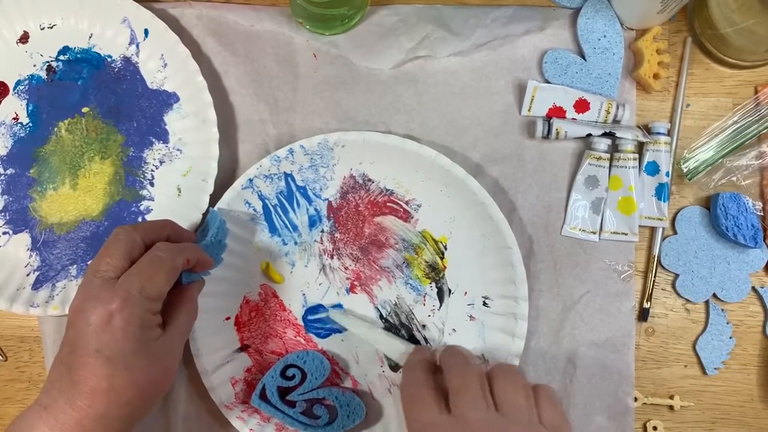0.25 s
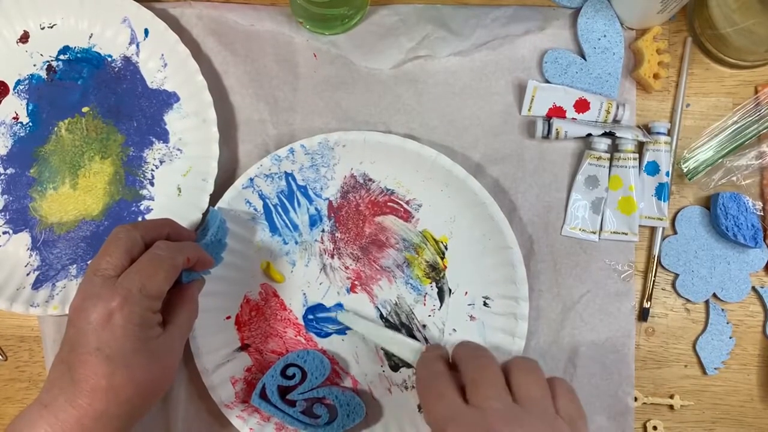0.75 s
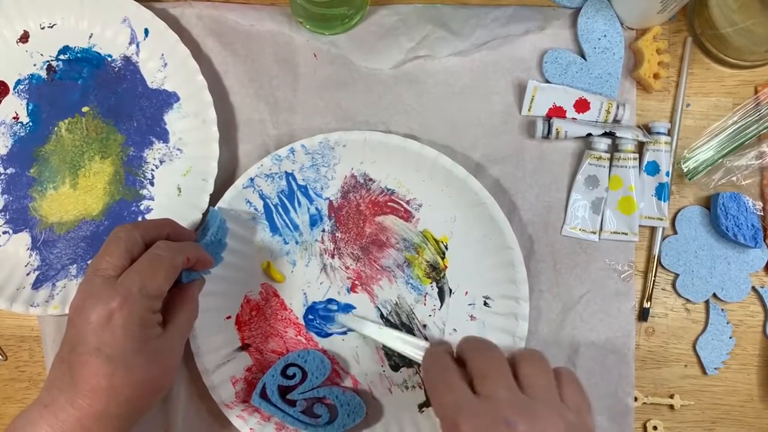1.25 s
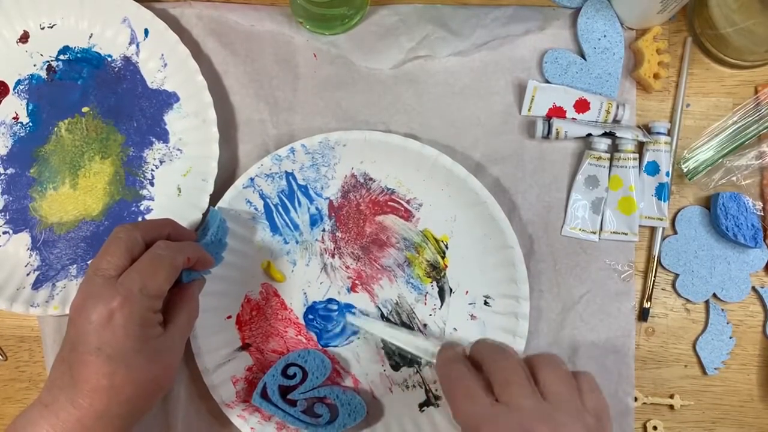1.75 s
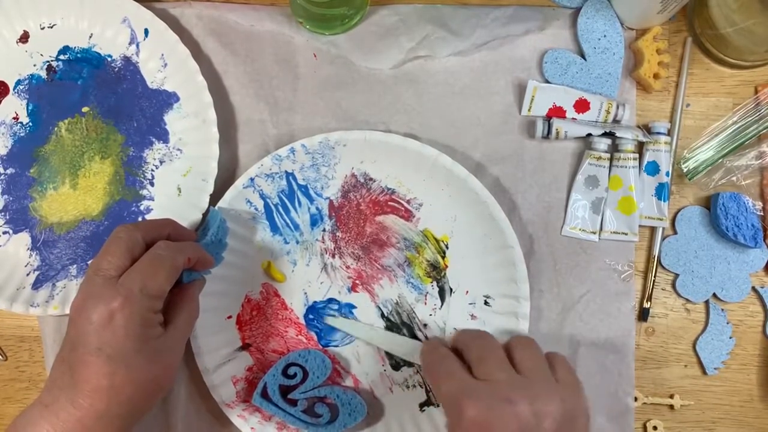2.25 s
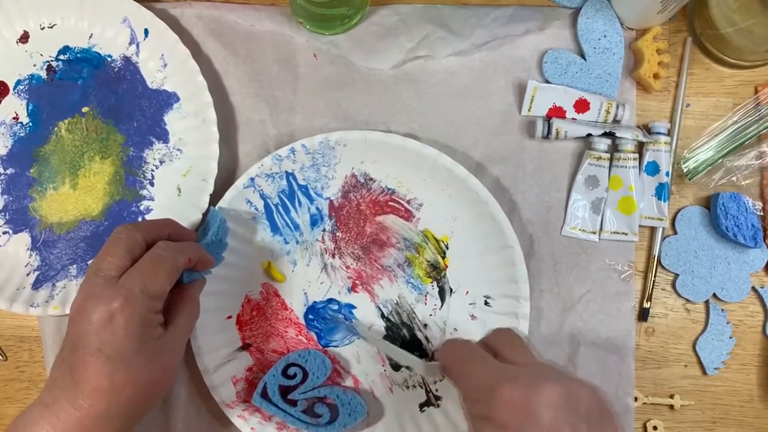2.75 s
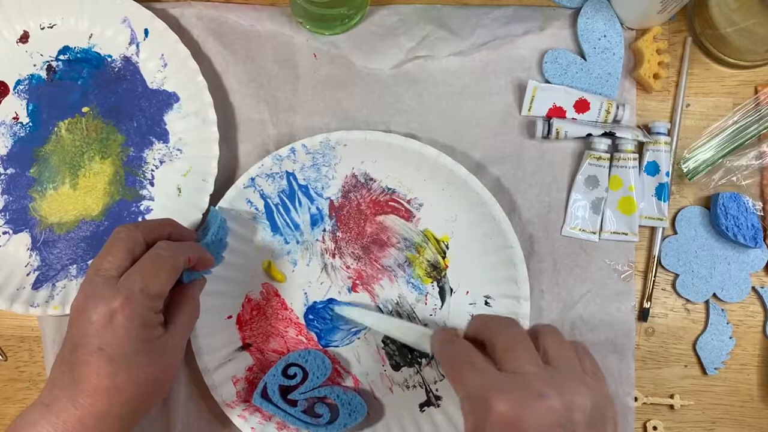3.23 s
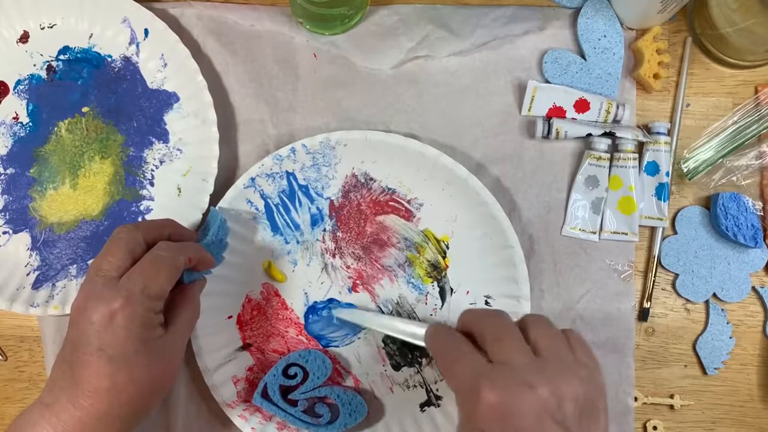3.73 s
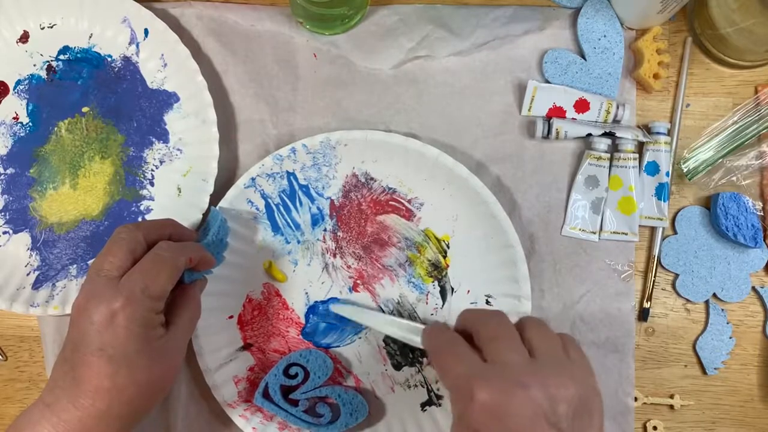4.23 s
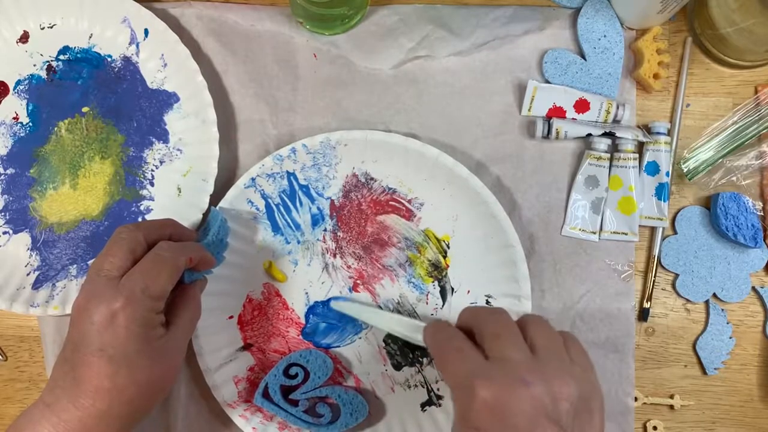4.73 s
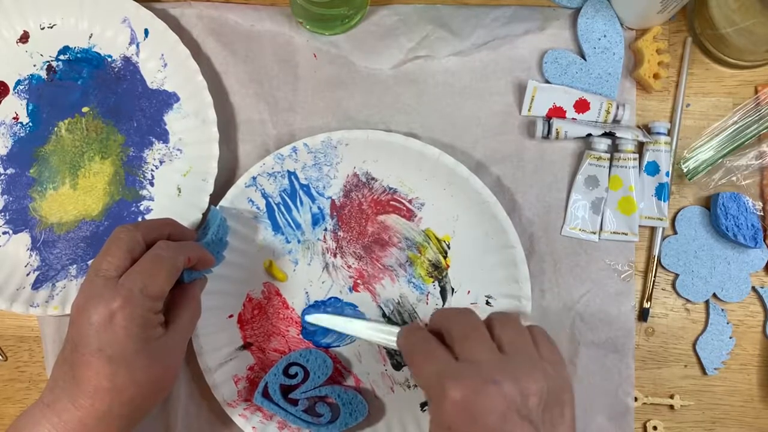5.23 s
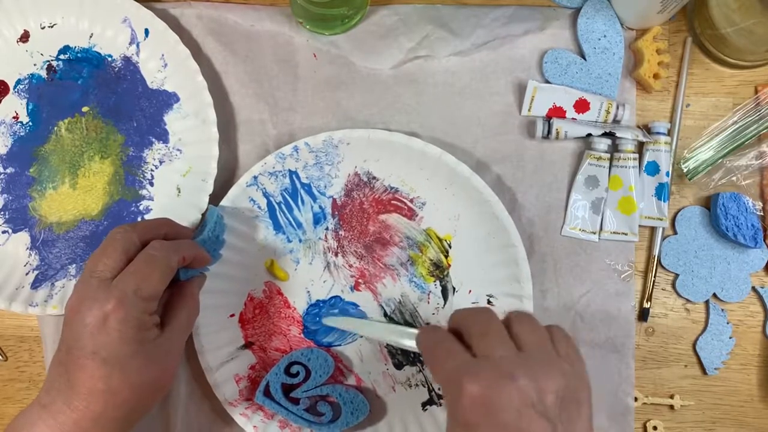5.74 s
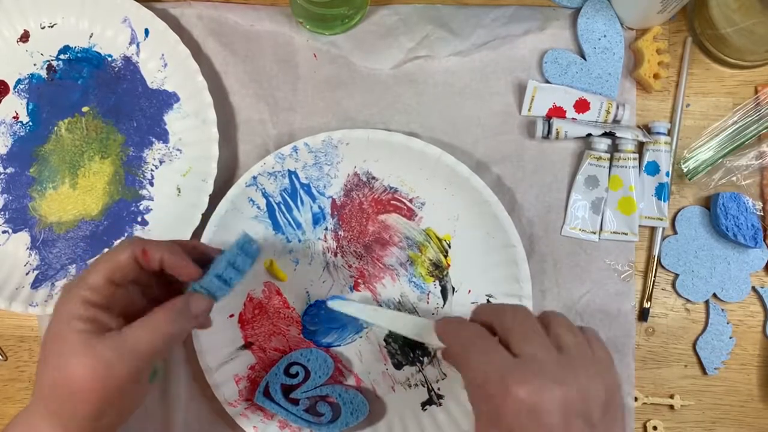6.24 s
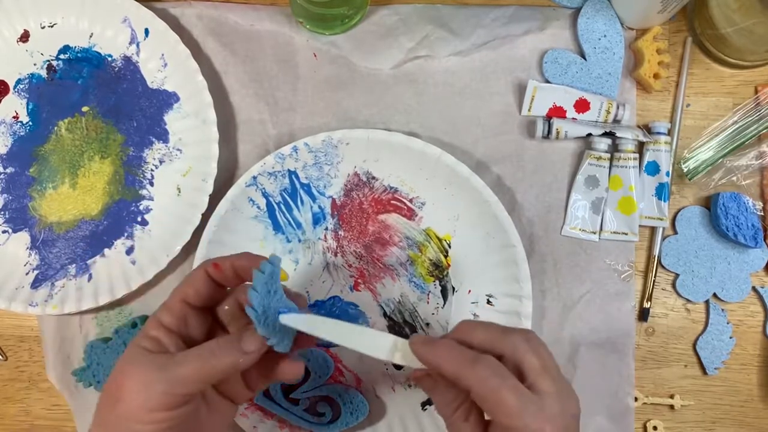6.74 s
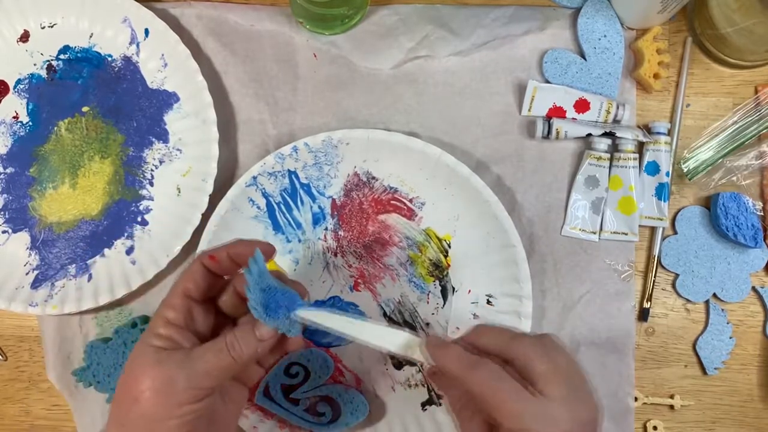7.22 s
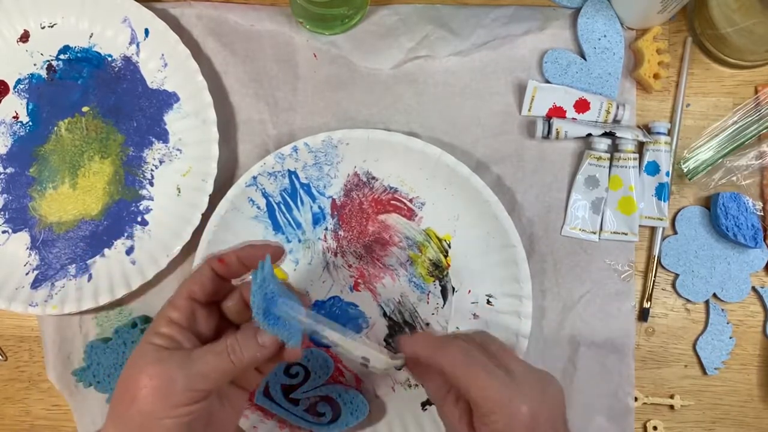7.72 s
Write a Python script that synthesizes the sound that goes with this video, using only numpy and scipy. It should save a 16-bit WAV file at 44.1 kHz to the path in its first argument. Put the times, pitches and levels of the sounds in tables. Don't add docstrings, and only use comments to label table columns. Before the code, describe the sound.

In a quiet room, a plastic blade scrapes back and forth rapidly on a thin paper plate, hollow and scratchy, with irregular taps and tiny clicks. The rhythm loosens briefly around the third second, then resumes evenly. Finally the hand shifts with low soft bumps and wipes the blade gently on a sponge. Distant traffic rumbles deeply throughout; one faint bird chirp comes early. Recorded close by a phone in stereo.

```python
import sys
import numpy as np
from scipy import signal
from scipy.fft import rfft, irfft, next_fast_len
from scipy.io import wavfile
from scipy.ndimage import uniform_filter1d, map_coordinates

SR = 44100
rng = np.random.default_rng(int(sys.argv[2]) if len(sys.argv) > 2 else 0)


def how_loud(loudness_db):
    steps = np.asarray(loudness_db, float) / 20
    return 10 ** steps


def master(y):
    cut = np.clip(np.atleast_2d(y).T, -1, 1)
    pcm = np.round(cut * 32767)
    wavfile.write(sys.argv[1], SR, pcm.astype(np.int16))


N = 351679
T = np.arange(N) / SR

# [t/s, plate level/dB, skid length/s]
LANDINGS = [(0.224, -59.5, 0.0039), (0.24, -64, 0.016), (0.442, -73, 0.018), (0.464, -55.5, 0.013),
            (0.493, -61, 0.049), (0.758, -61, 0.1), (1.039, -70, 0.033), (1.2714, -51.5, 0.046),
            (1.526, -62, 0.011), (1.7495, -53.5, 0.027), (2.046, -62.5, 0.019), (2.261, -52, 0.019),
            (3.455, -52.5, 0.023), (3.713, -55.5, 0.04), (3.978, -55.5, 0.038), (4.193, -53, 0.051),
            (4.4468, -56, 0.033), (4.698, -53.5, 0.052), (4.931, -50.5, 0.031), (5.183, -56.5, 0.066),
            (5.4, -56.5, 0.014), (5.6073, -54.5, 0.055), (5.778, -55, 0.023), (5.823, -55, 0.01),
            (5.846, -51.5, 0.04), (6.082, -56, 0.041), (6.299, -60, 0.017)]
# [t/s, peak level/dB]
LIFTS = [(0.1023, -48), (0.383, -50), (0.6477, -49), (0.915, -50.5), (1.2046, -53), (1.4513, -51),
         (1.688, -50), (1.906, -50), (2.176, -48.5), (2.558, -52), (2.731, -60.5), (2.913, -54),
         (3.182, -61.5), (3.373, -65), (3.627, -48), (3.8859, -47.5), (4.3765, -50.5), (4.147, -55),
         (4.619, -55), (4.8686, -58), (5.106, -56), (5.3259, -50), (5.5486, -50), (6.007, -54.5),
         (6.251, -61.5)]
# [f/Hz, level/dB]
EDGE = [(5000, -38), (6800, -2.5), (8200, -13), (9500, 1.5), (10700, -1), (14500, -6.5), (15700, -11),
        (16000, -82)]


def scrape():
    # [t/s at top speed, plate level/dB, half length/s, edge hiss over plate/dB]
    sweeps = [(0.027, -54.5, 0.046, -9), (0.309, -50, 0.039, -7), (0.572, -53, 0.038, -7.5),
              (0.844, -52.5, 0.038, -6.5), (1.128, -49, 0.036, -8.5), (1.393, -50.5, 0.031, -7.5),
              (1.625, -49, 0.042, -8), (1.852, -48, 0.036, -4), (2.127, -49.5, 0.037, -6.5),
              (2.424, -51.5, 0.078, -10.5), (2.802, -55.5, 0.02, -16.5), (2.834, -61.5, 0.1, -18.5),
              (3.318, -58, 0.023, -6.5), (3.554, -50.5, 0.036, -9), (3.835, -49.5, 0.039, -6.5),
              (4.09, -47.5, 0.014, -1.5), (4.109, -50, 0.031, -7), (4.321, -48.5, 0.034, -7),
              (4.559, -52, 0.029, -9.5), (4.812, -50.5, 0.037, -10), (5.045, -49.5, 0.033, -8),
              (5.282, -49, 0.03, -6.5), (5.491, -49, 0.038, -8), (5.733, -48.5, 0.033, -7),
              (5.952, -53, 0.036, -5), (6.181, -53, 0.036, -8.5), (6.354, -61.5, 0.016, -14)]
    spots = [0.19, 0.21, .4, 0.48, 0.46, 0.51, 0.3, 0.65, 0.22, .4, 0.54, 0.82, 0.3, .4, .4, 0.58, 0.22,
             0.53, 0.57, 0.22, 0.27, 0.81, 0.83, 0.45, 0.84, 0.61, 0.29]
    # [f/Hz, level/dB]
    middle_colour = [(900, -7.5), (1800, -1), (2600, -1), (3300, 2), (4300, -0.5), (5500, 1.8),
                     (9000, -0.5)]
    # [f/Hz, level/dB]
    rim_colour = [(900, -12), (1800, -8), (2600, -10), (3300, 0), (4200, 4.5), (5500, 1.5), (9000, 2)]
    longest_s = 0.08
    plate_longer, fall_longer = 1.17, 0.83
    skid_hiss_db, scuff_db, scuff_hiss_db, scuff_s = -11, -10, -14, 0.013
    nearing_db, nearing_s = -11.5, 0.006

    t = T[::20]
    power = np.zeros((3, len(t)))
    for s, db, skid in LANDINGS:
        way = np.abs(t - s) / min(skid, longest_s)
        levels = np.array([[db], [db + skid_hiss_db]])
        power[::2] += how_loud(levels - 6 * way ** 3) ** 2 * (t >= s)
        before = t < s
        power[0] += how_loud(db + nearing_db - 9 * (s - t) / nearing_s * before) ** 2 * before
    for s, db, half, over in sweeps:
        way = (t - s) / (min(half, longest_s) * np.where(t < s, 1, fall_longer))
        levels = np.array([[db], [db + over]])
        power[1:] += how_loud(levels - 7 * (way / [[plate_longer], [1]]) ** 2) ** 2
    for s, db in LIFTS:
        levels = scuff_db + np.array([[db], [db + scuff_hiss_db]])
        power[::2] += how_loud(levels - 7 * ((t - s) / scuff_s) ** 2) ** 2
    power = uniform_filter1d(power, size=3, axis=1)
    slow, fast, edge = (np.interp(T, t, np.sqrt(np.abs(p))) for p in power)

    def rub_colours(f):
        flat = np.zeros_like(f)
        return plate(f) * how_loud([[flat], [along(middle_colour, f)], [along(rim_colour, f)]])

    rub, dull, bright = grit(rub_colours, 1.8, 2.4, 2.6)
    hiss = grit(colour(EDGE), 1.9, 1.9, 0.89)
    rim = np.interp(T, [row[0] for row in sweeps], np.clip(spots, 0, 1))
    sweep = (1 - rim) * dull + rim * bright
    return how_loud(-4.5) * (slow * rub + fast * sweep) + how_loud(2.5) * edge * hiss


def taps():
    # [t/s, peak level/dB, ringing f/Hz, crack level over it/dB]
    tip_hits = [(0.257, -48, 3470, -1), (0.3742, -58, 4200, -29), (0.495, -55, 3910, -8),
                (0.694, -64.5, 5470, -20), (0.7892, -49.5, 2320, -21), (1.0715, -50.5, 4130, -12),
                (1.3058, -67, 2490, -19), (1.55, -67, 2510, -14), (2.0657, -50.5, 2550, -5),
                (2.2974, -44, 2540, -13), (2.3398, -58, 1690, -11), (2.3755, -52, 2500, -17),
                (6.222, -53.5, 2500, -8), (2.4959, -56.5, 3300, -11), (2.5202, -51, 2800, -18),
                (2.591, -55.5, 2430, -32), (2.7105, -46, 2500, -38), (2.929, -60.5, 2550, -34),
                (3.1874, -46.5, 3800, -16), (3.2231, -62, 5500, -17), (3.342, -51, 2270, -24),
                (3.4788, -47.5, 2700, -25), (3.742, -51.5, 2500, -23), (4.2312, -47.5, 2540, -20),
                (4.4758, -51, 2750, -8), (4.7178, -46, 3100, -21), (4.9634, -52, 3080, -17),
                (5.439, -52.5, 2100, -24), (5.8466, -69, 3100, -14), (6.0992, -72, 3997, -15),
                (0.094, -64, 3470, -20), (0.348, -54, 3500, -15), (1.7, -53, 3670, -15),
                (1.781, -54, 2300, -20), (2.19, -53.5, 2500, -19), (2.574, -58.5, 4440, -15),
                (2.978, -74.5, 2500, -42), (3.214, -61, 2600, -32), (3.2975, -58, 3760, -12),
                (3.364, -56.5, 3000, -15), (4.0538, -58, 2140, -23), (4.392, -57.5, 2300, -23),
                (4.407, -57, 2500, -18), (4.5217, -55, 3050, -8), (4.632, -62, 3000, -18),
                (5.118, -64, 2500, -18), (5.428, -63, 1800, -28), (5.877, -53, 2500, -20),
                (6.2995, -55, 2560, -23)]
    # [t/s, peak level/dB, f/Hz]
    more_hits = [(0.3324, -50, 5500), (.125, -65, 3500), (.529, -52, 4170), (2.032, -68, 2500),
                 (2.135, -53, 3000), (2.149, -57, 6500), (2.567, -54, 5000), (3.761, -58, 5000),
                 (3.901, -64, 3000), (4.6, -55.5, 3500), (4.8727, -61, 3000), (4.952, -63, 3300),
                 (5.199, -59, 2500), (5.336, -63, 3000), (5.36, -72, 3000), (5.643, -60, 1900),
                 (6.125, -60, 3000), (6.228, -65, 3000)]
    # [t/s, peak level/dB, f/Hz, 60 dB decay/s]
    pings = [(1.551, -56, 12000, .003), (2.3765, -46, 6900, .005), (2.7113, -36, 3550, .008),
             (2.712, -44, 5600, .007), (2.712, -48, 7300, .006), (2.7112, -45, 1740, .012),
             (2.7114, -38, 2800, .006), (1.2732, -48, 2500, .014), (1.2732, -51, 1650, .012),
             (2.7116, -39, 2540, .022), (.3311, -38, 12500, .003), (2.1151, -45, 12000, .003),
             (3.5224, -46, 12500, .003), (3.7973, -47, 11500, .003), (4.3041, -43, 12500, .003),
             (5.0275, -42, 12500, .003), (5.251, -46, 12000, .003), (5.464, -46, 12500, .003),
             (5.7069, -45, 12000, .003), (3.421, -64, 8200, .004), (4.0766, -37, 12500, .003),
             (4.3246, -32, 12800, .003), (4.5187, -56, 12000, .003), (5.8477, -54, 12000, .003)]
    blows = tip_hits + [(s, db - 2, 2300, -11) for s, db, _ in LANDINGS]
    blows += [(s, db, hz, -14) for s, db, hz in more_hits]
    blows += [(s, db, 2550, -21.5) for s, db in LIFTS]

    size = 900
    t = np.arange(size) / SR
    soft_start = 1 - np.exp(-t / 0.0016)
    ring, spot, crack = np.zeros((3, 2, N + size))
    bursts = rng.standard_normal((len(blows), 3, 2, size)) * soft_start
    for (s, db, hz, crack_db), burst in zip(blows, bursts):
        start = round(s * SR)
        at = slice(start, start + size)
        ring[:, at] += how_loud(db + 2.5 - 60 * t / 0.037) * burst[0]
        spot[:, at] += how_loud(db + 4) * knock(hz, 1.1, 0.013, burst[1])
        crack[:, at] += how_loud(db + crack_db - 1.5 - 60 * t / 0.008) * burst[2]
    for s, db, hz, t60 in pings:
        start = round(s * SR)
        spot[0, start:start + size] += how_loud(db - 60 * t / t60) * np.sin(2 * np.pi * hz * t)
    for s, db, _ in LANDINGS:
        crack[0, round(s * SR)] += how_loud(db - 16 + 17)
    return filtered(ring[:, :N], plate) + spot[:, :N] + filtered(crack[:, :N], colour(EDGE))


def plate(f):
    # [f/Hz, width/Hz, level/dB]
    resonances = [(1200, 640, -8), (1763, 160, 1), (1857, 510, -3.5), (2500, 184, 8), (3330, 1020, 1),
                  (4286, 780, 1), (5140, 560, 1), (7220, 2100, -6.5)]
    total = 0
    for k, (centre, width, db) in enumerate(resonances):
        damping = 1j * f * width
        total = total + (-1) ** k * how_loud(db) * damping / (centre * centre - f * f + damping)
    return total / (1 + 1j * f / 9500 - (f / 9500) ** 2) ** 2


def grit(response, spiky_db, clump_db, patchy_db):
    grain = how_loud(spiky_db * rng.exponential(size=N) + clump_db * wobble(260))
    noise = grain * rng.standard_normal((2, N))
    return unit(filtered(patchy(noise, patchy_db, size=512, count=5), response))


def sponge():
    # [t/s, level/dB, half length/s]
    wipes = [
        (7.335, -72, 0.046),
        (7.64, -67.5, 0.042),
        (7.756, -78, 0.017),
    ]
    # [f/Hz, level/dB]
    sponge_colour = [(2500, -30), (4800, -26), (5500, -3.5), (8000, -9), (11000, -4), (14000, -12),
                     (16000, -40)]
    press = sum(how_loud(db - 4.5 * np.clip((T - s) / half, -3, 3) ** 4) for s, db, half in wipes)
    return press * unit(filtered(rng.standard_normal((2, N)), colour(sponge_colour)))


def bumps():
    # [t/s, level/dB, f/Hz]
    knocks = [(0.117, -85, 610), (0.258, -71, 706), (0.47, -76, 754), (0.654, -63.5, 1390), (0.8, -77, 800),
              (1.42, -78, 700), (3.221, -72.5, 895), (3.75, -80, 800), (4.96, -80, 826), (0.691, -81, 530),
              (1.276, -67.5, 900), (1.688, -77, 686), (1.909, -67, 410), (2.594, -87, 490),
              (2.712, -70, 1130), (2.715, -62, 825), (2.711, -59.5, 1670), (2.734, -72, 1090),
              (4.195, -63, 1670), (4.475, -69, 990), (5.974, -71, 423), (6.082, -72, 1200),
              (6.302, -72, 1650), (7.359, -83, 375), (7.503, -84, 475), (4.459, -70.5, 327),
              (5.45, -72, 300), (5.57, -72, 520), (5.641, -67, 930), (5.824, -62, 1090), (5.823, -64, 2100),
              (5.834, -68.5, 338), (6.925, -76, 2350), (6.926, -73.5, 1700), (6.923, -67.5, 1200),
              (6.928, -67.5, 540), (6.945, -78, 1910), (6.975, -80, 1300), (6.942, -62.5, 540),
              (6.924, -78, 3400), (6.934, -65, 227), (6.943, -65, 300), (6.955, -72, 553),
              (6.96, -61.5, 253), (6.972, -67, 420), (6.983, -76, 497), (6.996, -73, 383),
              (7.661, -71, 480), (7.69, -75, 470), (7.821, -75.5, 1380), (7.899, -74, 1100)]
    size = 2600
    out = np.zeros((2, N + size))
    bursts = rng.standard_normal((len(knocks), 2, size))
    for (s, db, hz), burst in zip(knocks, bursts):
        start = round(s * SR)
        out[:, start:start + size] += how_loud(db + 10.5) * knock(hz, 2.4, 0.054 + 11 / hz, burst)
    return out[:, :N]


def knock(hz, sharp, t60, burst):
    t = np.arange(burst.shape[1]) / SR
    peak = signal.iirpeak(hz, sharp, SR)
    once = signal.lfilter(*peak, burst * how_loud(-60 * t / t60))
    ring = signal.lfilter(*peak, once)
    return ring / np.abs(ring).max()


def walls(x):
    # [f/Hz, 60 dB decay/s]
    decay = [(500, 0.53), (3000, 0.12), (12000, 0.13)]
    step = SR // 4
    out = np.zeros((2, N + SR))
    for at in range(0, N, step):
        hz, t, z = signal.stft(rng.standard_normal((2, SR // 3)), SR, nperseg=256)
        dying = z * how_loud(-60 * t / along(decay, hz)[:, None])
        tail = signal.istft(dying, SR, nperseg=256)[1]
        echo = signal.fftconvolve(x[:, at:at + step], tail / np.linalg.norm(tail[0]), axes=1)
        out[:, at:at + echo.shape[1]] += echo
    return out[:, :N]


def outdoors():
    # [t/s, level/dB]
    traffic = [(0, -44.5), (0.15, -45.5), (0.48, -47), (0.62, -50.5), (1.64, -49.5), (2.05, -50),
               (2.26, -42.5), (3.4, -47), (4.2, -49.5), (4.95, -50.5), (5.15, -53), (6.57, -55.5),
               (7.05, -50), (7.4, -51.5), (7.97, -49.5)]
    # [f/Hz, level/dB]
    rumble = [(35, -25.5), (60, -4.5), (68, -10), (81, -10.5), (122, -14), (151, -29), (200, -47.5),
              (300, -120)]
    # [f/Hz, level/dB]
    mode_band = [(25, -120), (47, -7), (53, 0), (60, -6), (110, -120)]
    # [f/Hz, level/dB]
    deep = [(12, -10.5), (25, -8.5), (36, -0.5), (46, -6.5), (64, -120)]
    # [f/Hz, level/dB]
    drone = [(100, -10), (170, -4), (291, -4), (365, -16), (505, -12), (594, -25.5), (800, -43.5),
             (1300, -120)]
    # [f/Hz, level/dB]
    air_colour = [(500, -8), (640, -6.5), (820, -5), (1050, -3), (2000, -8), (4500, -12.5), (13300, -12.5),
                  (14000, -37)]
    # [f/Hz, likeness 0 to 1]
    room_alike = [(100, 0.95), (200, 0.75), (400, 0.23), (2000, 0.2), (4500, 0.25), (7000, 1), (15000, 1)]
    rumble_db, = curves(traffic)
    more_db = rumble_db + 52
    low = how_loud(rumble_db) * (hush(rumble) + how_loud(4) * hush(mode_band))
    low += how_loud(-57.5 + 1.77 * more_db) * hush(deep)
    low += how_loud(-71 + 0.63 * more_db) * hush(drone)
    air = how_loud(-80 + 1.3 * wobble(6.5)) * hush(air_colour)
    engines = passing() * how_loud([[-1.5], [1.5]])
    chirp = bird() * how_loud([[1.5], [-1.5]])
    return spread(low + air, room_alike) + room_mode() + engines + chirp


def room_mode():
    # [t/s, level/dB, f/Hz, half length/s]
    swells = [(0.2, -41, 50.44, 0.27), (0.47, -38.5, 53, 0.052), (0.8, -39, 55.8, 0.032),
              (1.15, -49, 53.95, 0.63), (1.42, -57, 48.6, 0.045), (1.6, -39, 55.3, 0.044),
              (1.83, -43.5, 58, 0.044), (2.04, -40, 54.6, 0.023), (2.31, -27, 53, 0.066),
              (2.59, -31, 51.5, 0.065), (2.8, -34, 52.8, 0.016), (2.952, -28, 47.4, 0.064),
              (3.22, -37.5, 51.4, 0.41), (3.44, -52, 54.5, 0.03), (3.6, -34, 52.6, 0.04),
              (3.79, -58, 49.2, 0.024), (4.01, -34.5, 55.65, 0.048), (4.245, -36.5, 49.5, 0.036),
              (4.49, -43, 49.4, 0.037), (4.78, -41.5, 56, 0.042), (4.9, -36.5, 50, 0.029),
              (5.17, -41.5, 57.2, 0.055), (5.48, -41, 53.3, 0.042), (5.65, -45.5, 52.9, 0.067),
              (6.49, -41.5, 50, 0.023), (6.82, -43.5, 51.1, 0.078), (7.05, -37.5, 54, 0.053),
              (7.22, -36.5, 52.1, 0.047), (7.5, -46, 52.94, 0.57), (7.82, -44, 53.4, 0.11)]
    out = np.zeros(N)
    for k, (s, db, hz, half) in enumerate(swells):
        swell = how_loud(db - 5.5 * np.clip((T - s) / half, -5, 5) ** 2)
        out += (-1) ** k * np.sqrt(2) * swell * np.sin(2 * np.pi * hz * (T - s))
    return out


def passing():
    # [start t/s, end t/s, starting f/Hz, level/dB, width/Hz]
    vehicles = [(.2, 4.4, 346, -86, 3), (4.0, 6.2, 953, -88, 13), (5.4, 7.5, 1242, -92, 14),
                (1.06, 1.29, 1280, -71.5, 320), (.85, 1.35, 1320, -75, 600), (0.7, 1.39, 1500, -81, 1300),
                (7.45, 7.78, 1150, -80, 1100), (-.2, .3, 1500, -80, 1200), (7.5, 7.8, 1750, -84, 900),
                (0.85, 1.42, 950, -80, 400), (0.85, 1.42, 600, -76, 300), (0.7, 1.45, 330, -73, 150),
                (1.8, 3.6, 1690, -88, 110), (.6, 1.55, 520, -76.5, 69), (4, 6.7, 535, -79, 45)]
    sinks_per_s = 0.021
    out = np.zeros(N)
    for start, end, from_hz, db, width in vehicles:
        at = (T >= start) & (T < end)
        t = T[at] - start
        swell = np.sin(np.pi * t / (end - start)) ** 0.42
        turn = 2 * np.pi * np.cumsum(from_hz * (1 - sinks_per_s * t)) / SR
        sway = rng.standard_normal((2, 2000))
        a, b = (np.interp(t * width, np.arange(2000), part) for part in sway)
        out[at] += how_loud(db) * swell * ((a + 10 / width) * np.sin(turn) + b * np.cos(turn))
    return out


def bird():
    # [t/s, f/Hz, level/dB]
    low_note = [(.105, 5200, -81), (.125, 5300, -77), (.165, 5330, -77), (.222, 5040, -79)]
    # [t/s, f/Hz, level/dB]
    high_note = [(.176, 7150, -90), (.188, 7080, -84), (.2, 6900, -84), (.212, 6700, -90)]
    return tone(low_note, 0.32) + tone(high_note, 0.4)


def tone(rows, rough):
    hz = curves(rows)[0]
    db = curves(rows, -200)[1]
    return np.sqrt(2) * how_loud(db) * np.sin(2 * np.pi * np.cumsum(hz) / SR + rough * wobble(25))


def hush(points):
    noise = patchy(rng.standard_normal((2, N)), 2.8, size=2048, count=5)
    return unit(filtered(noise, colour(points)))


def patchy(pair, patchy_db, size, count):
    z = signal.stft(pair, nperseg=size)[2]
    field = uniform_filter1d(rng.standard_normal(z.shape[1:]), count, axis=0)
    field = uniform_filter1d(field, size=5, axis=1)
    return signal.istft(z * how_loud(patchy_db * unit(field)), nperseg=size)[1][:, :N]


def spread(pair, alike):
    def shares(hz):
        turn = np.arccos(np.clip(along(alike, hz), 0, 1)) / 2
        return np.array([np.cos(turn), np.sin(turn)])

    mid, side = filtered(pair, shares)
    return np.array([mid + side, mid - side])


def unit(x):
    return x / np.sqrt(np.mean(x ** 2) + 1e-20)


def along(points, hz):
    f, v = np.transpose(points)
    return np.interp(np.log(hz + 1), np.log(f + 1), v)


def curves(rows, outside=None):
    s, *cols = np.transpose(rows)
    return [np.interp(T, s, c, outside, outside) for c in cols]


def wobble(rate):
    return map_coordinates(rng.standard_normal(int(N * rate / SR) + 4), [T * rate])


def filtered(x, response):
    m = next_fast_len(N + 8192)
    return irfft(rfft(x, m) * response(np.fft.rfftfreq(m, 1 / SR)), m)[..., :N]


def colour(points):
    return lambda hz: how_loud(along(points, hz))


def scene():
    # [f/Hz, likeness 0 to 1]
    knife_alike = [(700, 0.2), (1700, 0.7), (4500, 0.55), (6000, 1), (15000, 1)]
    # [f/Hz, left over right/dB]
    knife_lean = [(900, 0), (1500, -2.5), (2500, -7.5), (3200, -1), (4500, -5.5), (6000, 0.5)]
    knife = scrape() + taps() + sponge()
    knife = spread(knife + how_loud(-8) * walls(knife) + bumps(), knife_alike)
    lean = lambda hz: how_loud(np.outer([0.5, -0.5], along(knife_lean, hz)))
    return filtered(knife, lean) + outdoors()


def top_cut(x):
    return signal.sosfilt(signal.butter(12, 15750, fs=SR, output="sos"), x)


def record(dry):
    # [f/Hz, left leads by/radians]
    lead = [(0, 0), (260, 0), (700, 3.1), (1100, 6), (2700, 7.6), (3350, 6.1), (4300, 7.3), (4800, 9.4),
            (7000, 12.57), (9700, 15.7), (12200, 18.85), (14900, 22), (22050, 30)]
    f, turn = np.transpose(lead)
    wide = filtered(dry, lambda hz: np.exp(1j * np.outer([0.5, -0.5], np.interp(hz, f, turn))))
    return top_cut(wide)


dry = scene()
out = record(dry)
master(out)
```